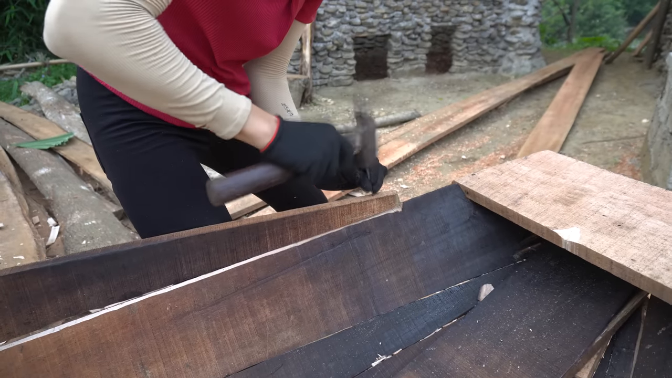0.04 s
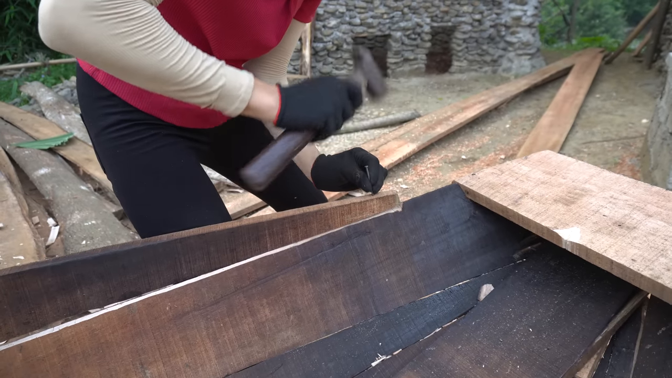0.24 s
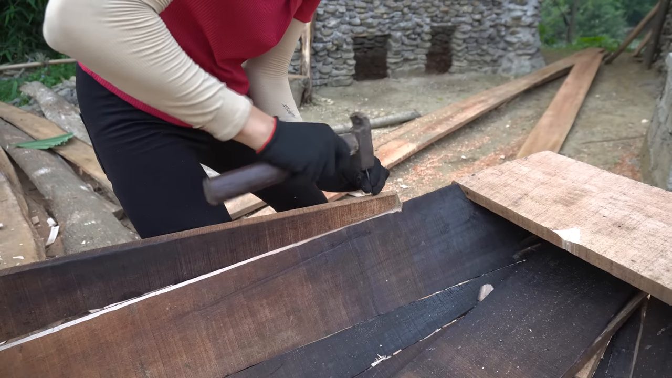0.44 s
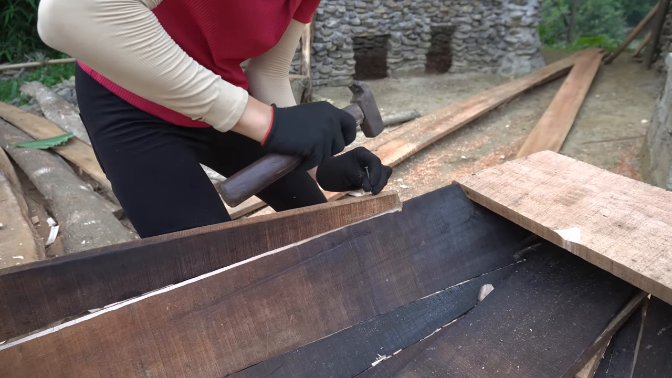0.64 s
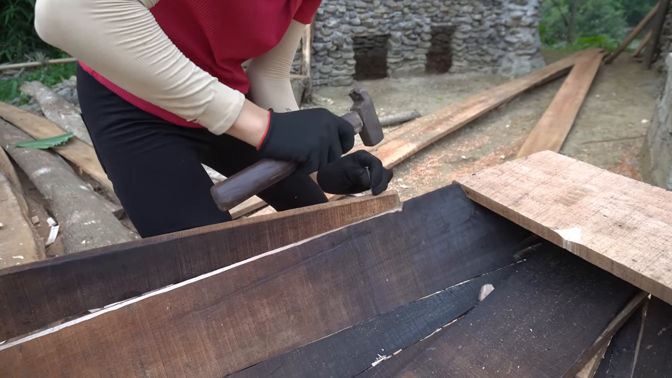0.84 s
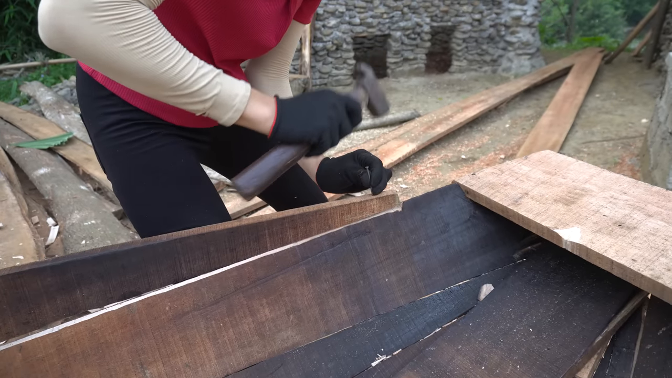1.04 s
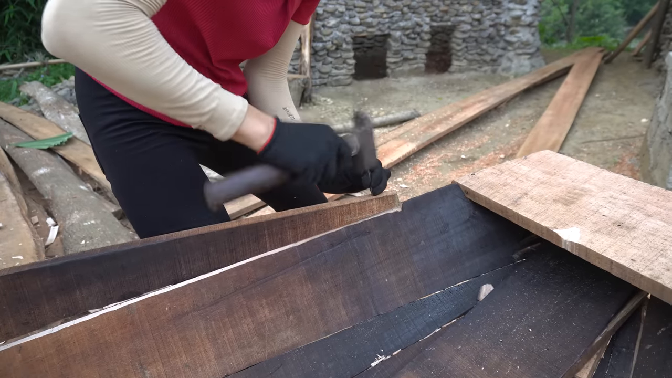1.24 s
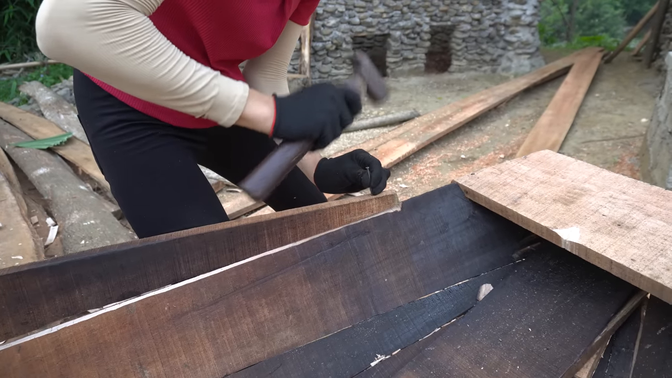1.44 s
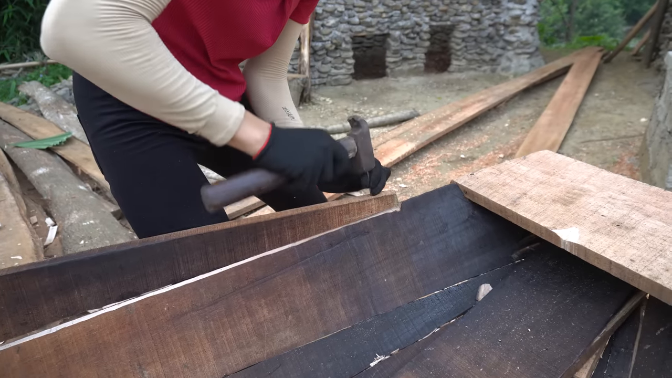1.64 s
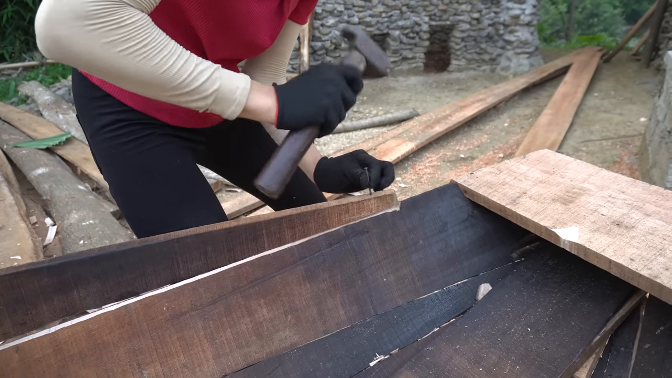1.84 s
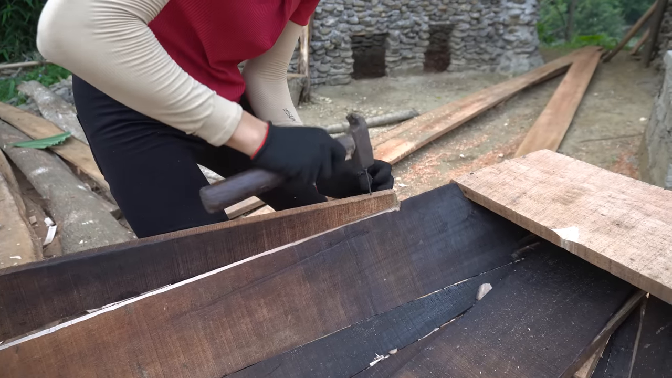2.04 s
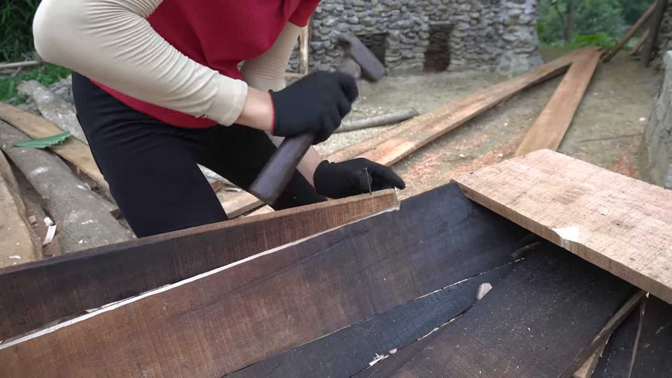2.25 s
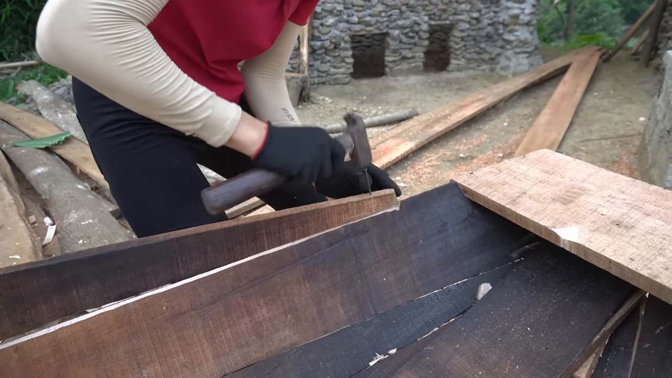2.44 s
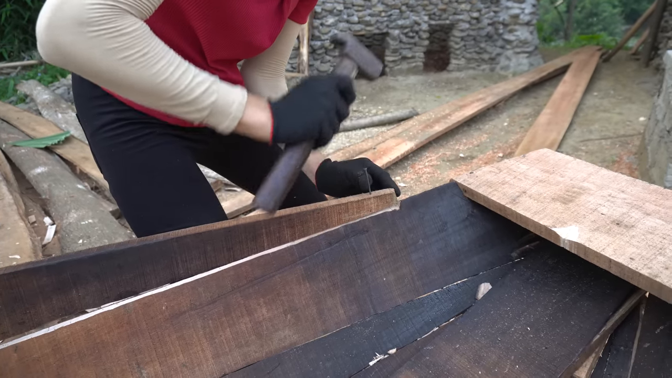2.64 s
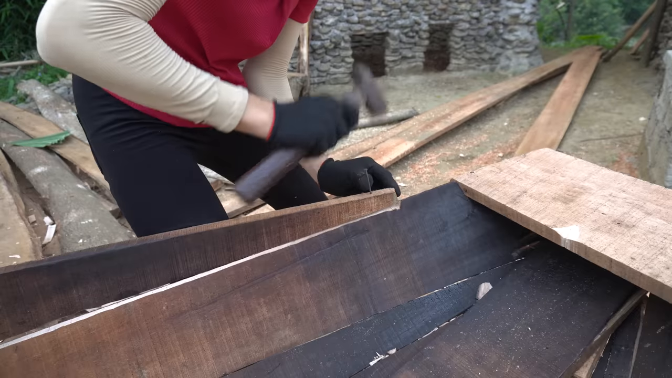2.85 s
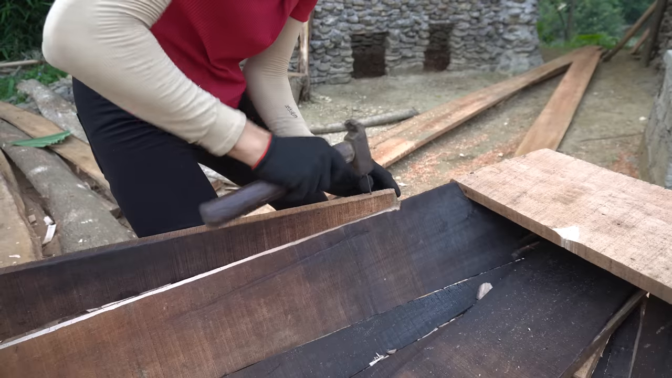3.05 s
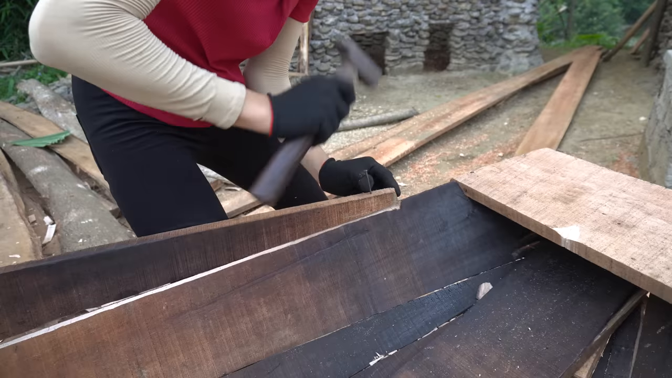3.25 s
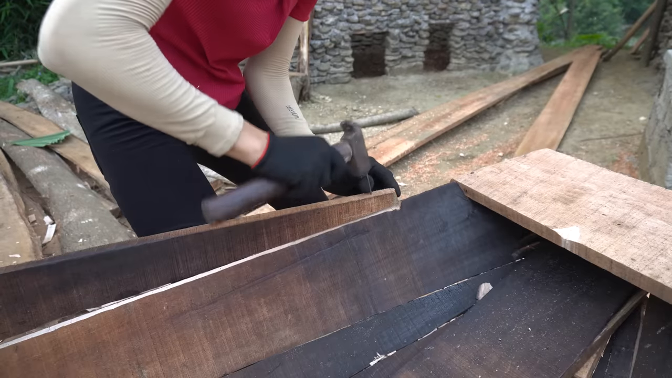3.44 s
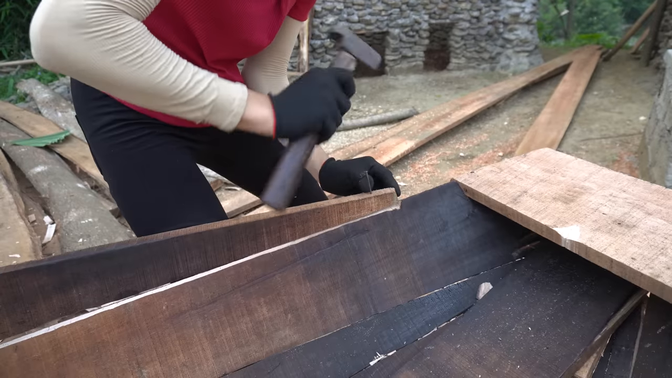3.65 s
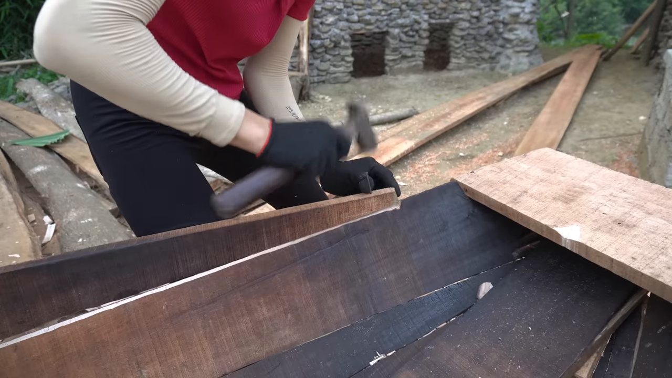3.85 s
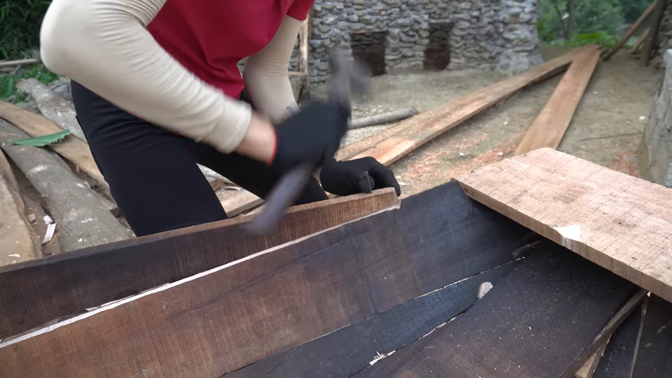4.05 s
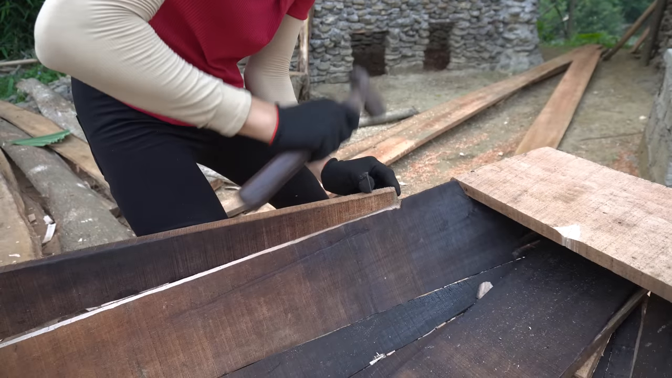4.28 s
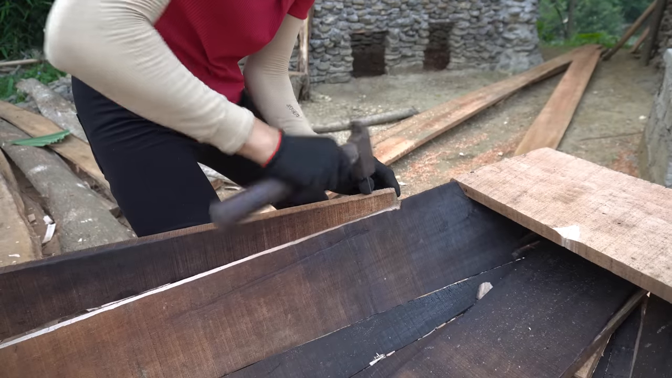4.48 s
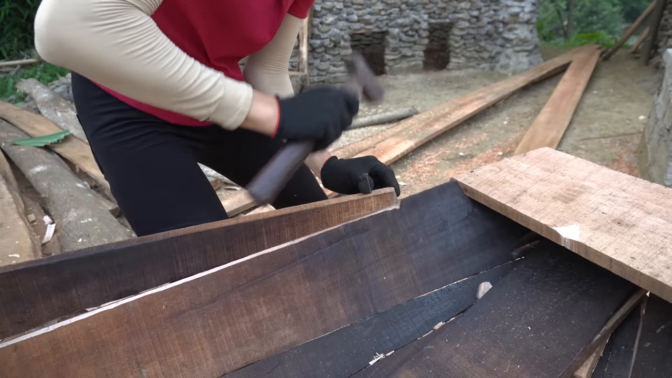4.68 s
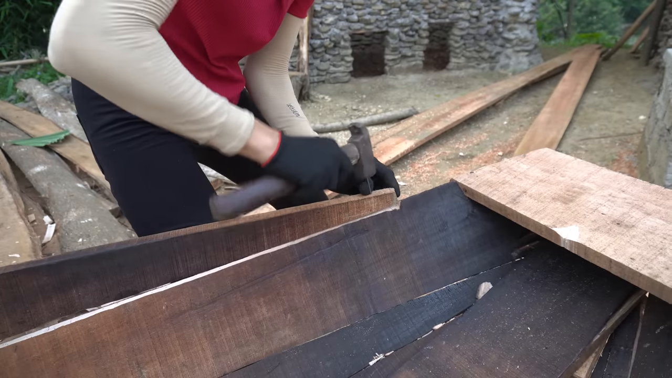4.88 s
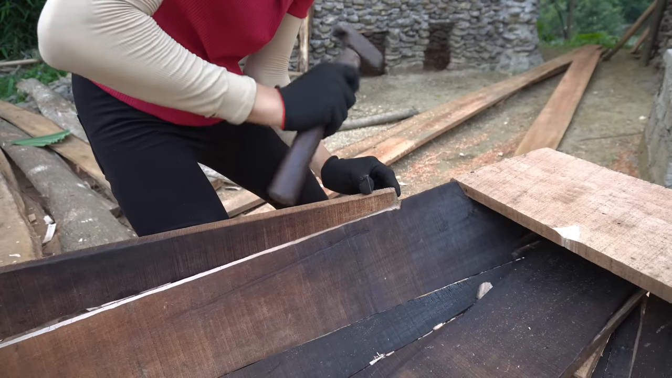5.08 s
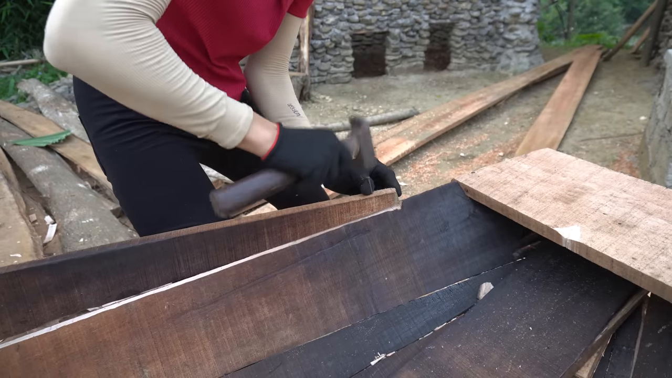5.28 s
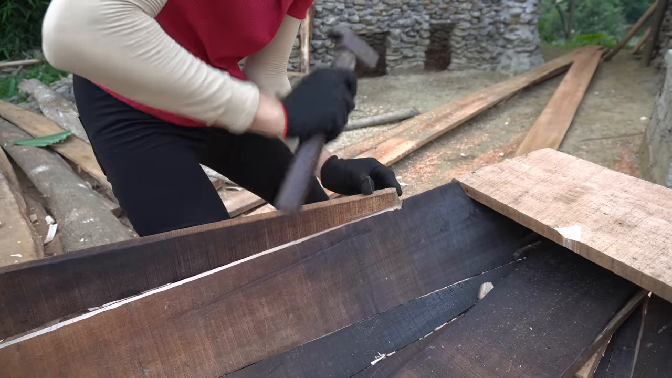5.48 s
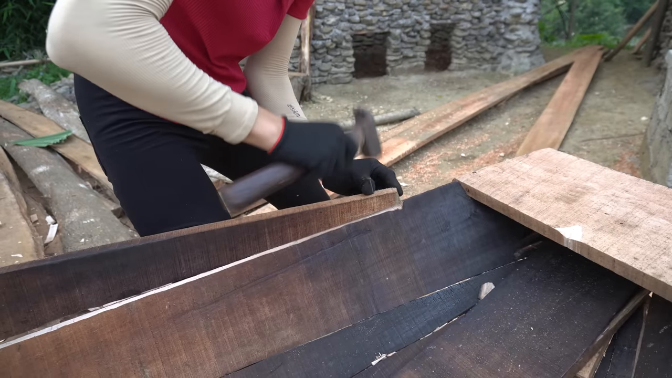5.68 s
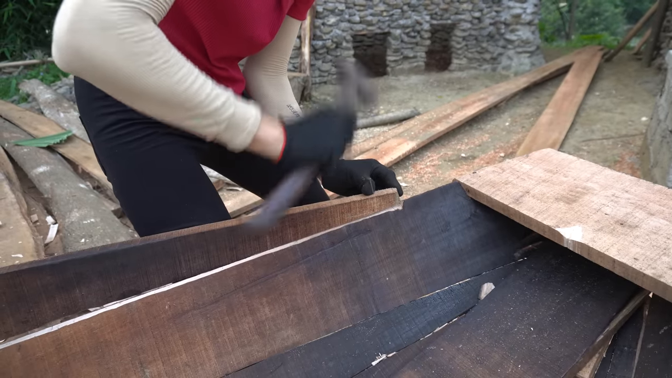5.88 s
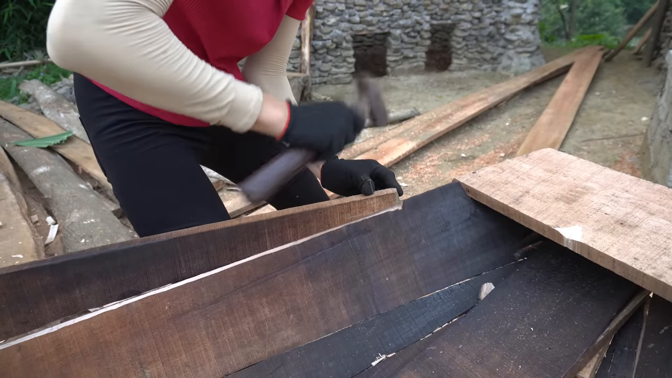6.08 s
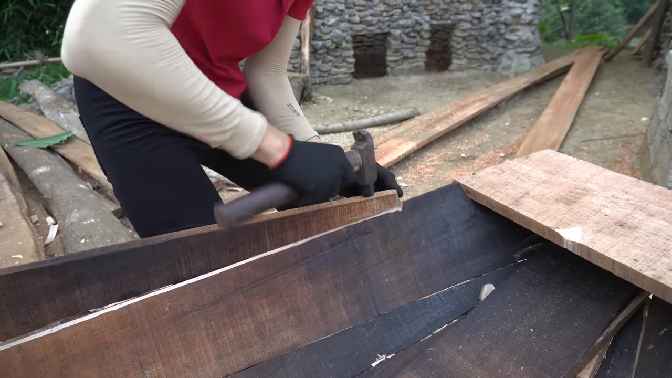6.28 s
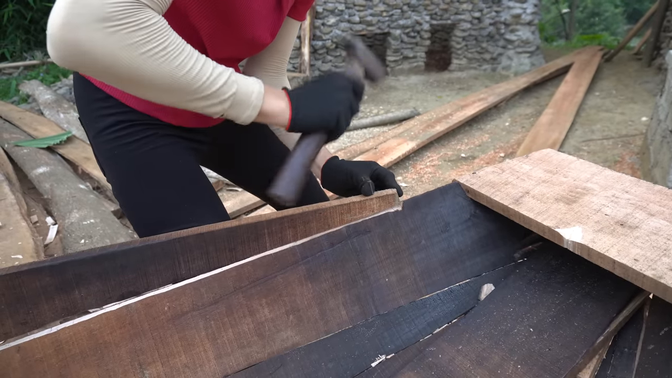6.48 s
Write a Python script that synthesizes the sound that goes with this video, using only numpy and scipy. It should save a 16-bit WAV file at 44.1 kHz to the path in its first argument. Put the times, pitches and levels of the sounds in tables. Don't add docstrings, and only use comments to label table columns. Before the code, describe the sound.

Steady close hammering on a big wooden hull outdoors, bright metallic cracks with woody knocks and low booms, quiet breeze, insects and a far cockerel behind.

```python
import sys
import numpy as np
from scipy import signal
from scipy.fft import rfft, irfft, next_fast_len
from scipy.io import wavfile
from scipy.ndimage import uniform_filter1d

SR = 44100
rng = np.random.default_rng(int(sys.argv[2]) if len(sys.argv) > 2 else 0)


def level_to_linear(level):
    exponent = np.asarray(level, float) / 20
    return 10 ** exponent


def master_out(mix):
    frames = np.transpose(np.atleast_2d(mix))
    ceiling = np.clip(frames, -1, 1)
    pcm = np.round(ceiling * 32767).astype(np.int16)
    wavfile.write(sys.argv[1], SR, pcm)


N = 287532

# t/s, crack level/dB, plank knock level/dB, yard wash level/dB, extra crack edge level/dB
HAMMER_BLOWS = [(0.0491, -8.5, -14.5, -46, 8), (0.4214, -8.5, -16.5, -46.5, 2),
                (1.247, -6.5, -16.5, -48, 2), (1.5987, -6, -17.5, -44, 3), (1.9724, -7, -16.5, -43.5, 2),
                (2.378, -7, -15.5, -45, 4), (2.7199, -6.5, -16, -43.5, 2), (3.0723, -6.5, -15.5, -43, 1),
                (3.425, -5, -15, -43.5, 0), (3.7768, -6.5, -15, -42.5, 2), (4.125, -6, -15, -42.5, 0),
                (4.484, -5.5, -16.5, -43, 1), (4.8445, -4, -15.5, -40.5, -1), (5.1873, -5, -13, -41.5, 4),
                (5.565, -6, -15, -42.5, 6), (5.9189, -4.5, -14.5, -41.5, 8), (6.2674, -4, -17.5, -41.5, 8)]
ARRIVAL_S = .0006
OPPOSED = np.array([[1], [-1]])


def read(points, hz):
    f, value = np.transpose(points)
    return np.interp(np.log(hz + 1), np.log(f + 1), value)


def evened(x):
    return x / np.sqrt(np.mean(x ** 2) + 1e-20)


def add(mix, s, sound):
    part = mix[..., round(s * SR):][..., :sound.shape[-1]]
    part += sound[..., :part.shape[-1]]


def band(x, hz, width):
    quality = max(hz / width, .2)
    return signal.lfilter(*signal.iirpeak(min(hz, 20000), quality, SR), x)


def noise(size, colour_db, same, count=256):
    frames, hz = 4 * size // count + 5, np.fft.rfftfreq(count, 1 / SR)[:, None]
    a, b, c, d = rng.standard_normal((frames, len(hz), 4)).T
    left, other = a + 1j * b, c + 1j * d
    alike = np.clip(same(hz), -1, 1)
    z = np.array([left, alike * left + np.sqrt(1 - alike ** 2) * other])
    z *= level_to_linear(colour_db(hz, np.arange(frames) * count / 4 / SR))
    return signal.istft(z, nperseg=count, noverlap=3 * count // 4)[1][:, :size]


def air():
    # f/Hz, level/dB per Hz
    hiss_spectrum = [(12, -34), (20, 7), (291, -4.5), (335, -2), (848, -15), (1120, -6.5), (1330, -25),
                     (1530, -18), (1970, -10), (2850, -30), (4600, -9.5), (7220, -27.5), (8310, -16),
                     (14600, -32), (16800, -34)]
    # f/Hz, left-right likeness
    coherence = [(60, 0.39), (180, 0.19), (550, 0.59), (1650, 0.44), (4970, 0.08), (15000, 0.15)]
    # t/s, level/dB
    breeze = [(0.0, -44), (0.16, -55), (0.38, -51), (0.8, -62.5), (1.12, -62), (1.42, -52.5), (1.94, -46),
              (2.2, -54.5), (4.21, -51.5), (4.61, -60.5), (5.16, -40.5), (5.39, -46.5), (6.3, -55.5),
              (6.52, -43.5)]
    # middle t/s, length/s, level/dB
    scuff_events = [
        (.82, .09, -54),
        (1.145, .1, -54),
        (4.73, .15, -54),
        (5.08, .15, -52),
        (5.4, .12, -54),
        (6.2, .1, -55),
        (6.5, .08, -52),
    ]
    t = np.arange(N) / SR
    gust_db = np.interp(t, *np.transpose(breeze))

    sway, after = np.full(N, level_to_linear(-73)), t[:SR]
    sway_db, sway_rise_s, sway_t60 = -38, 0.045, 1.15
    for s, *_ in HAMMER_BLOWS:
        rise = 1 - np.exp(-after / sway_rise_s)
        add(sway, s, level_to_linear(sway_db - 60 * after / sway_t60) * rise)
    scuffs = sum(level_to_linear(db) * np.exp(-(2 * (t - s) / length) ** 2) for s, length, db in scuff_events)

    hiss = noise(N, lambda hz, u: read(hiss_spectrum, hz) + 0 * u, lambda hz: read(coherence, hz), count=1024)
    white = rng.standard_normal((4, N))
    thud = evened(band(band(white[3], 21, 30), 21, 30)) * sway
    rumble = evened(band(band(white[0], 250, 360), 250, 360)) * level_to_linear(gust_db - 2)

    mean_db = gust_db.mean()
    stirred = level_to_linear(mean_db + 0.23 * (gust_db - mean_db) - 4.5) + scuffs
    rustle = evened(band(band(white[1:3] + 0.68 * white[0], 890, 2460), 800, 1620)) * stirred

    fizz = level_to_linear(-66.5) * band(white[1:3] + .4 * white[3], 13000, 6000)
    throb = 1 + .3 * evened(uniform_filter1d(white[0], 6000))
    chorus = band(band(white[1:3] + .5 * white[0], 7600, 1300), 7600, 1300)
    insects = level_to_linear(-52.5) * throb * chorus
    return insects + level_to_linear(-54.5 - 2.5) * evened(hiss) + thud + rumble + rustle + fizz


def steel(edge_db):
    # f/Hz, width/Hz, level/dB
    crack_modes = [(3000, 2000, -2), (4700, 2000, -6), (8000, 2600, 0), (10200, 2600, -3),
                   (12300, 2200, -11), (14800, 2500, -19)]
    t = np.arange(round(.04 * SR)) / SR
    spark = 0.055 * rng.standard_normal((2, len(t))) * np.exp(-t / 0.0032)
    spark[0, 0] = 1
    crack = 0
    for k, (hz, width, db) in enumerate(crack_modes):
        level = level_to_linear(db + edge_db * (hz > 11500))
        crack = crack + (-1) ** k * level * band(band(spark, hz, 2 * width), hz, width)
    middle, side = crack
    return np.array([middle + side, middle - side]) / np.abs(middle).max()


def ring(modes, t, drift):
    total = 0
    for (hz, db, t60), (d, d_db) in zip(modes, drift):
        t60 = min(t60, max(85 / hz, .13))
        total = total - level_to_linear(db + d_db - 60 * t / t60) * np.sin(2 * np.pi * hz * t * (1 + d))
    return total


def hull_boom(t, luck):
    # f/Hz, level/dB, t60/s
    hull_modes = [(66.5, -12.5, 0.47), (77.8, -18, 0.57), (96.33, -5, 0.58), (100, -11, 0.63),
                  (121.9, -7, 0.37), (134.5, -10, 0.53), (148.8, -6.5, 0.46), (175.6, 1.5, 0.35),
                  (184.46, 0, 0.43), (212, -1.5, 0.45), (237.5, -7, 0.57), (263.6, -1.5, 0.53),
                  (290.4, 5.5, 0.26), (321, 3.5, 0.11), (374, -5, 0.24), (404, -4, 0.22), (440, 3, 0.067)]
    # f/Hz, level/dB, t60/s
    push_mode = [(245, 9.1, 0.06)]
    return ring(hull_modes, t, luck) * (1 - np.exp(-t / 0.022)) + ring(push_mode, t, luck)


def plank_knock(t, luck, hull_count):
    # f/Hz, level/dB, t60/s
    plank_modes = [(547.7, -1.5, 0.12), (575.7, 7.5, 0.085), (584, -6.5, 0.26), (595, 11, 0.068),
                   (685, -3, 0.14), (742, 2.5, 0.41), (822, 1, 0.13), (910, -9, 0.33), (947, 6, 0.084),
                   (1074, 8.5, 0.087), (1335, 5, 0.046), (1432, -4.5, 0.18), (1540, -8.5, 0.061),
                   (1810, 0.5, 0.065), (1972, -6, 0.05), (2370, -11, 0.12), (2490, -3.5, 0.037),
                   (2716, -3.5, 0.07), (2925, -0.5, 0.021)]
    spread = 1 - np.exp(-t / 0.0033)
    even, odd = plank_modes[::2], plank_modes[1::2]
    knock = (ring(even, t, luck[hull_count:]) - 0.52 * ring(odd, t, luck[3:])) * spread
    aside = ring(even, t, luck[::-1] * [3, 1.2]) * spread
    return knock, aside


def scatter(t):
    # f/Hz, level/dB per Hz
    wash_spectrum = [(180, -39), (300, 1.5), (671, -14), (834, -10), (1580, -21.5), (1720, -19.5),
                     (2170, -23), (2790, -27), (3900, -34.5), (5370, -31), (7130, -32.5), (15200, -47.5),
                     (16500, -71)]
    # f/Hz, t60/s
    wash_decay = [(300, 0.25), (700, 0.19), (1500, 0.18), (3000, 0.28), (6000, 0.24), (12000, 0.28)]
    # f/Hz, rise/s
    wash_onset = [(500, 0.0028), (2500, 0.0024), (4500, 0.051), (12000, 0.036)]
    # f/Hz, left-right likeness
    wash_coherence = [(200, 0.41), (500, 1), (1000, 0.61), (2500, 0.17), (8000, 0.053)]

    def colour_db(hz, s):
        arrived = 1 - np.exp(-((s + 0.00024) / read(wash_onset, hz)) ** 2)
        return read(wash_spectrum, hz) - 60 * (s - .06) / read(wash_decay, hz) + 20 * np.log10(arrived)

    tail = noise(len(t), colour_db, lambda hz: read(wash_coherence, hz))
    return tail / np.std(tail[:, 2200:4000]) * (1 - np.exp(-t / 0.00044))


def wall_echoes(out, s, knock, knock_db, t):
    # delay t/s, level/dB
    wall_returns = [
        (.139, -30),
        (.15, -30),
        (.176, -35),
    ]
    returned = band(knock, 1470, 810) * np.exp(-t / 0.03) * (1 - np.exp(-t / 0.0036))
    for delay, db in wall_returns:
        add(out, s + delay, level_to_linear(db + knock_db + 6) * returned)


def surface_echoes(out, s, wash_db, grains, t):
    # delay t/s, level/dB, centre f/Hz, width/Hz, smear/s
    surfaces = [
        (0.003, -30, 8000, 9000, 0.006),
        (0.14, -20, 1200, 1160, 0.034),
        (.178, -44, 705, 500, .012),
    ]
    for (delay, db, hz, width, smear), grain in zip(surfaces, grains):
        smeared = t / smear * np.exp(-3 * t / smear)
        add(out, s + delay, level_to_linear(db + wash_db + 47) * band(grain, hz, width) * smeared)


def bounces(out, knock, t):
    # t/s, level/dB
    bounce_events = [(.0655, -22), (.0904, -18), (1.6159, -20), (1.6432, -22), (1.991, -26), (2.016, -13),
                     (2.4212, -18), (2.756, -26), (3.4383, -32), (4.135, -20), (4.1431, -30), (4.5269, -18),
                     (4.862, -29)]
    for s, db in bounce_events:
        add(out, s + ARRIVAL_S, level_to_linear(db) * steel(2.5))
        add(out, s + ARRIVAL_S, level_to_linear(db - 6.5) * knock * np.exp(-t / .008))


def head_rings(out, t):
    # t/s, f/Hz, level/dB
    ring_events = [
        (.05, 5496, -43),
        (1.6, 5496, -42),
        (1.973, 5496, -42),
        (2.72, 13303, -34),
        (3.426, 5496, -40),
        (4.126, 5496, -36),
        (4.126, 15200, -42),
        (4.845, 5496, -43),
        (5.188, 5496, -40),
        (6.268, 5496, -46),
    ]
    for s, hz, db in ring_events:
        decay = level_to_linear(db - 1.2 - 60 * t * hz / 2100)
        tone = decay * np.sin(2 * np.pi * hz * t) * (1 - np.exp(-t * hz / 120))
        add(out, s, tone * np.ones((2, 1)))


def hammer():
    t, out = np.arange(round(.5 * SR)) / SR, np.zeros((2, N))
    yard = scatter(t)
    grains = rng.standard_normal((3, 2, len(t)))
    late = np.maximum(t - .0003, 0)
    hull_count, plank_count = 17, 19
    for s, crack_db, knock_db, wash_db, edge_db in HAMMER_BLOWS:
        luck = rng.standard_normal((hull_count + plank_count, 2)) * [.012, 2.8]
        luck[:hull_count] *= .55
        add(out, s + ARRIVAL_S, level_to_linear(crack_db + 6.2) * steel(edge_db))

        boom = hull_boom(late, luck)
        knock, aside = plank_knock(late, luck, hull_count)
        wood = level_to_linear(-15 + 5.9) * boom + level_to_linear(knock_db + 11) * (knock + 0.32 * aside * OPPOSED)
        wash = level_to_linear(wash_db + 23.7) * (0.8 * yard + .5 * scatter(t))
        add(out, s + ARRIVAL_S, wood + wash)

        wall_echoes(out, s, knock - aside * OPPOSED, knock_db, t)
        surface_echoes(out, s, wash_db, grains, t)
    bounces(out, knock, t)
    head_rings(out, t)
    return signal.sosfilt(signal.butter(2, 55, "high", fs=SR, output="sos"), out)


def birds():
    # t/s, length/s, first f/Hz, last f/Hz, level/dB
    crow_notes = [(.64, .17, 2090, 2040, -57), (.765, .19, 1985, 1930, -52), (.92, .12, 1940, 1915, -58),
                  (.615, .06, 1490, 1490, -55), (.665, .14, 1440, 1410, -58), (2.135, .15, 1400, 1392, -59),
                  (2.32, .06, 1350, 1420, -54), (2.265, .1, 2700, 2740, -61), (3.35, .06, 740, 752, -56),
                  (4.0, .11, 316, 327, -53), (1.84, .12, 333, 331, -51), (4.42, .055, 2480, 2680, -60),
                  (.275, .045, 2800, 2480, -67), (.315, .045, 2450, 2440, -62),
                  (.378, .035, 2500, 2640, -64), (5.8, .11, 520, 425, -53)]
    # t/s, top f/Hz, end f/Hz, level/dB
    chirp_events = [
        (0.846, 6000, 2300, -43),
        (3.022, 5200, 2400, -46),
    ]
    out = np.zeros(N)
    for s, length, first_hz, last_hz, db in crow_notes:
        t = np.arange(0, length, 1 / SR)
        luck = rng.standard_normal(SR // 2)
        waver = level_to_linear(1.8 * evened(uniform_filter1d(luck[::-1], 1500)))
        hoarse = (1 + .3 * evened(uniform_filter1d(luck, 350))) * waver
        glide_hz = first_hz + (last_hz - first_hz) * t / length
        tone = np.sin(2 * np.pi * np.cumsum(glide_hz) / SR)
        add(out, s, np.sqrt(2) * level_to_linear(db) * hoarse[:len(t)] * tone * signal.windows.tukey(len(t), .7))

    t = np.arange(round(.045 * SR)) / SR
    for s, top_hz, end_hz, db in chirp_events:
        fall_hz = end_hz + (top_hz - end_hz) * np.exp(-t / 0.013)
        chirp = np.sin(2 * np.pi * np.cumsum(fall_hz) / SR) * signal.windows.tukey(len(t), .25)
        add(out, s, level_to_linear(db) * chirp)
        echo = rng.standard_normal(3000) * np.exp(-np.arange(3000) / 1200.)
        add(out, s + 0.0078, level_to_linear(db - 48) * np.convolve(chirp, echo))

    t = np.arange(round(.3 * SR)) / SR
    trees = rng.standard_normal((2, len(t))) * np.exp(-t / 0.074) * level_to_linear(-36.5)
    direct = np.array([1.18 * out, 1.04 * np.roll(out, 5)])
    return direct + signal.oaconvolve(out[None], trees, axes=1)[:, :N]


def ticks():
    # t/s, level/dB, centre f/Hz
    tick_events = [
        (.645, -54, 2500),
        (4.266, -39, 1200),
        (5.412, -58, 900),
        (5.795, -51, 1000),
        (6.143, -55, 2000),
        (6.497, -52, 2290),
    ]
    out, t = np.zeros((2, N)), np.arange(800) / SR
    shape = np.exp(-t / 0.0055) * (1 - np.exp(-t / .002))
    for s, db, hz in tick_events:
        click = band(band(rng.standard_normal((2, len(t))), hz, 1800), hz, 1800)
        add(out, s, level_to_linear(db + 21.5) * click * shape)
    return out


def scene():
    return air() + hammer() + birds() + ticks()


def band_limit(x):
    return signal.sosfilt(signal.butter(12, 17150, fs=SR, output="sos"), x)


def record(dry):
    # f/Hz, left-right level/dB
    lean_spectrum = [(150, 0.0), (380, 0.7), (950, 2.5), (1500, 3), (2800, -2), (5500, -1.5), (8500, 1.5),
                     (15000, 2.5)]
    t, duck_db, attack = np.arange(round(.12 * SR)) / SR, np.zeros(N), np.zeros(N)
    top_hz, top_open_s = 15800, .008
    for s, *_ in HAMMER_BLOWS:
        release = np.clip(1 - np.maximum(t - .012, 0) / 0.042, 0, 1)
        add(duck_db, s + ARRIVAL_S, 20 * (1 - np.exp(-t / 0.0028)) * release)
        add(attack, s - top_open_s / 2, np.hanning(round(2 * top_open_s * SR)))
    ducked = 0.83 * np.tanh(dry / level_to_linear(uniform_filter1d(duck_db, 60)) / 0.95)

    size = next_fast_len(N)
    hz = np.fft.rfftfreq(size, 1 / SR)
    lean = level_to_linear(read(lean_spectrum, hz) / 2)
    leaned = rfft(ducked, size) * [lean, 1 / lean] / (1 + (hz / 16400) ** 30)
    kept = np.clip(.5 + (top_hz - hz) / 400, 0, 1)
    steady = irfft(leaned * kept, size)[:, :N]
    top = irfft(leaned * (1 - kept), size)[:, :N]
    return band_limit(steady + attack * top)


dry = scene()
out = record(dry)
master_out(out)
```